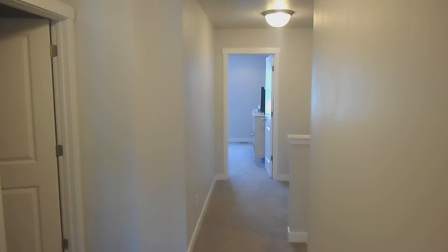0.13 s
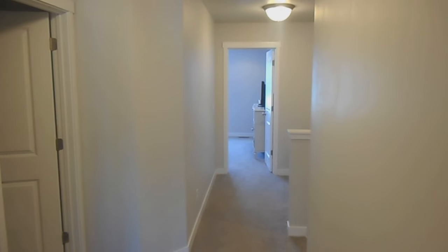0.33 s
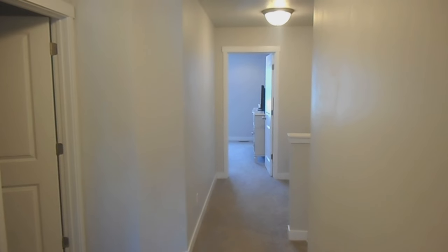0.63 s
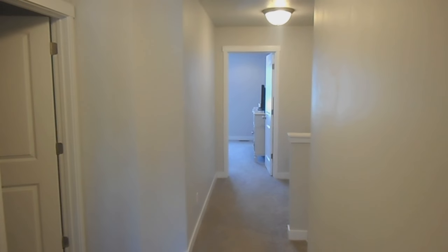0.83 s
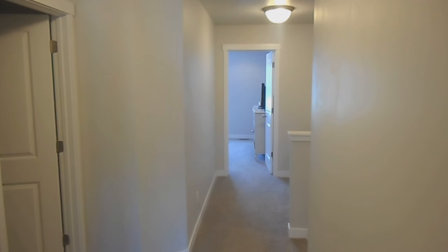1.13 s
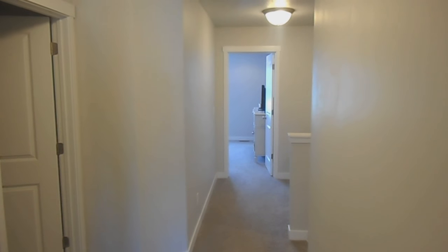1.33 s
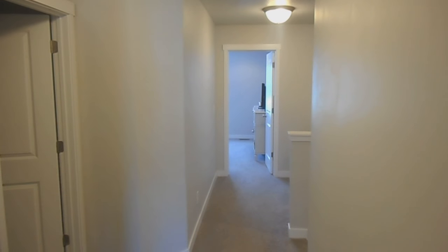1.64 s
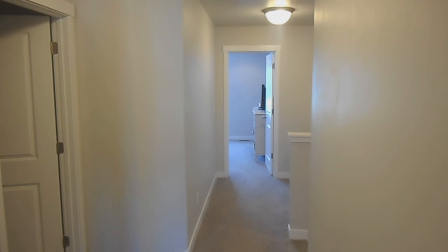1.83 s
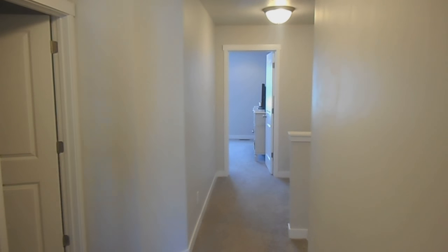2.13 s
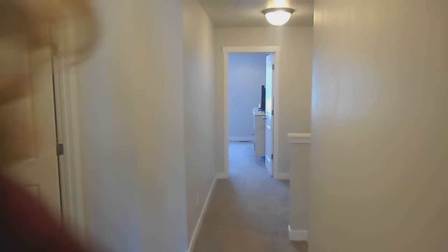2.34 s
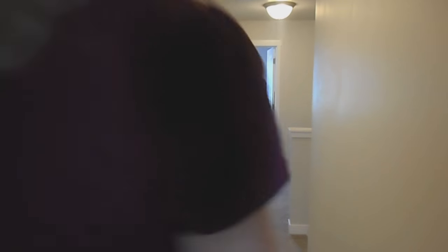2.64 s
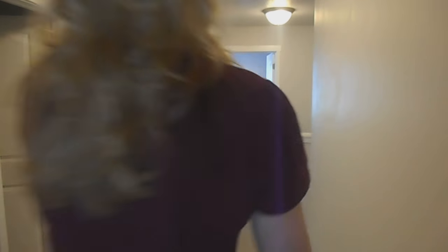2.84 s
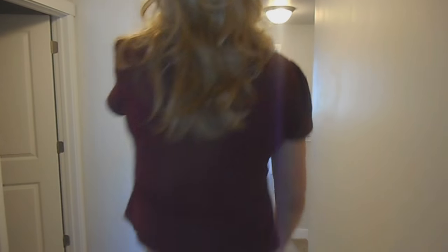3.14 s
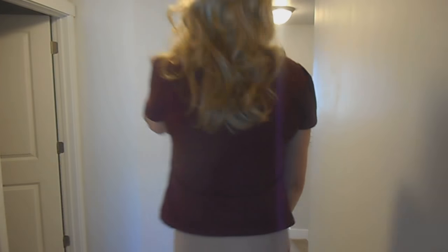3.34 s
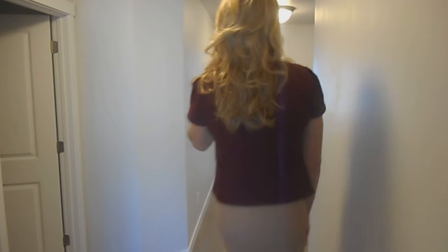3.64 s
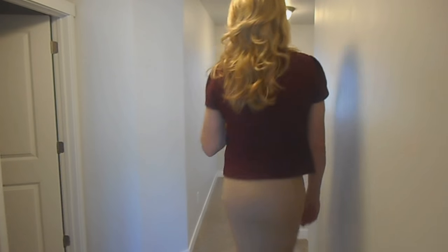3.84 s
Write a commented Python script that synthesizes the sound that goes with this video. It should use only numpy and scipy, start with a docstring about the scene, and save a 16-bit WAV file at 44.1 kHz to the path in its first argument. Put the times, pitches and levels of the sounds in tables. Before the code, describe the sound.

Muffled steps on carpet pass by with swishing clothes, then a sudden bright snap.

```python
"""A narrow carpeted hallway, heard in mono as someone walks softly past the microphone and on.
Soles thud and brush on the pile, the boards beneath knock, and clothes swish, with small ticks and
brief rasps, over a steady hiss. The walk ends in a hard scuff and one sharp, bright snap,
a quick cluster of cracks that rings between the close walls."""
import sys
import numpy as np
from scipy import signal
from scipy.fft import rfft, irfft
from scipy.io import wavfile

SR = 44100
rng = np.random.default_rng(int(sys.argv[2]) if len(sys.argv) > 2 else 0)


def int16_out(signal):
    """Quantize to a 16-bit WAV file."""
    q = np.round(np.clip(np.atleast_2d(signal).T, -1, 1) * 32767)
    wavfile.write(sys.argv[1], SR, q.astype(np.int16))


N = 176400


def amp(db):
    """Decibels to gain."""
    return 10 ** (np.asarray(db) / 20)


def unit_rms(x):
    """Scales to rms 1."""
    return x / np.sqrt(np.mean(x ** 2) + 1e-20)


def curve_at(points, hz):
    """Reads a table on a log-frequency axis."""
    freqs, values = np.transpose(points)
    return np.interp(np.log(hz + 1), np.log(freqs + 1), values)


def add(mix, start_s, sound):
    """Mixes a sound in at its start time."""
    part = mix[max(round(start_s * SR), 0):][:len(sound)]
    part += sound[:len(part)]


def coloured(x, colour, tilt=0):
    """Gives x a spectrum, tilted in dB per octave above 400 Hz, at rms 1."""
    hz = np.fft.rfftfreq(len(x), 1 / SR)
    octaves = np.log2(np.maximum(hz, 400))
    gain = amp(curve_at(colour, hz) + tilt * octaves)
    return unit_rms(irfft(rfft(x) * gain, len(x)))


def burst(noise, envelope):
    """Shapes noise in time so that it carries exactly the energy of the envelope."""
    return unit_rms(noise * envelope) * np.sqrt(np.mean(envelope ** 2))


def blows(rows, colour, rise_s, fall_s):
    """Short contacts with no clear pitch: a quick rise and an exponential fall."""
    out, t = np.zeros(N), np.arange(SR // 2) / SR
    envelope = np.minimum(t / rise_s, 1) * np.exp(-np.maximum(t - rise_s, 0) / fall_s)
    for start, db, tilt in rows:
        noise = coloured(rng.standard_normal(len(t)), colour, tilt)
        add(out, start, amp(db) * burst(noise, envelope))
    return out


def friction(rows, colour, slip_share, slips_per_s=2500):
    """Fibres catch and slip in a fine hiss that swells and dies with each stroke."""
    out, t = np.zeros(N), np.arange(N) / SR
    for peak, rise, fall, db, tilt in rows:
        slips = unit_rms(rng.standard_normal(N) * (rng.random(N) < slips_per_s / SR))
        rubbing = np.sqrt(slip_share) * slips + np.sqrt(1 - slip_share) * rng.standard_normal(N)
        swell = np.exp(-.5 * ((t - peak) / rise) ** 2)
        fade = np.exp(1 - np.hypot(1, (t - peak) / fall * np.sqrt(2)))
        out += amp(db) * np.where(t < peak, swell, fade) * coloured(rubbing, colour, tilt)
    return out


# The hiss behind the walk. Each row: frequency in Hz, relative level in dB.
HISS_COLOUR = [(20, -28), (40, -18), (70, -18.5), (110, -15.5), (160, -16), (220, -12), (340, -10),
               (480, -8), (650, -10), (1000, -5.5), (1300, -8), (1800, -10.5), (2350, -8), (2900, -10.5),
               (4500, -11), (7700, -16.5), (10400, -26.5), (12500, -34)]

def background(hiss_db=-60.5, hum_hz=114, hum_db=-78, hum_end_s=.82, hum_fade_s=.15):
    """Steady hiss, and a faint low hum that fades early."""
    t = np.arange(N) / SR
    hiss = coloured(rng.standard_normal(N), HISS_COLOUR)
    hum = np.sin(2 * np.pi * hum_hz * t) * np.clip((hum_end_s - t) / hum_fade_s, 0, 1)
    return amp(hiss_db) * hiss + amp(hum_db) * hum


# Ticks along the hallway. Each row: start in seconds, level in dB, tilt in dB per octave.
TICKS = [(0.0832, -46, -1.5), (0.1138, -50, 1), (2.8674, -43.5, 1.5), (2.8844, -49, 1), (2.9755, -44.5, 2),
         (3.6036, -44, 0), (3.993, -47, -0.5)]
# Their tone. Each row: frequency in Hz, relative level in dB.
TICK_COLOUR = [(100, -11), (700, -5.5), (1600, 4.5), (3500, 0.5), (5500, -3.5), (8000, -11), (10500, -25.5)]

def ticks():
    """Small dry contacts that die within milliseconds."""
    return blows(TICKS, TICK_COLOUR, rise_s=.00097, fall_s=.0034)


# Soles on the carpet. Each row: peak, rise and fall in seconds, level in dB, tilt in dB per octave.
SCUFFS = [(0.095, .02, 0.047, -60.5, -1.5), (0.27, .08, 0.075, -63, -1.5), (0.86, 0.024, 0.037, -55.5, 0.5),
          (1.25, 0.028, 0.035, -55.5, -1.5), (1.335, .02, .04, -54.5, 2.5), (1.44, 0.038, 0.045, -54, -0.5),
          (2.085, 0.039, 0.045, -58, -2), (2.17, .03, .045, -55.5, -1.5), (2.3, 0.044, 0.047, -53.5, 0),
          (2.6, .14, 0.093, -61, 2), (2.878, 0.046, .04, -50.5, 0), (3.0, .05, 0.074, -57.5, 2.5),
          (3.462, 0.014, .045, -53, 1), (3.555, 0.036, 0.069, -54.5, 0.5), (3.684, 0.015, .018, -43, 2),
          (3.72, .015, 0.02, -56, -2)]
# Their tone. Each row: frequency in Hz, relative level in dB.
SCUFF_COLOUR = [(40, -22), (150, -11.5), (300, -10.5), (450, -4), (650, -1), (1200, 1), (2000, -4.5),
                (3400, -4.5), (5500, -12.5), (8000, -20.5), (10500, -33)]

def scuffs():
    """Soles brush the pile with a grainy rub."""
    return friction(SCUFFS, SCUFF_COLOUR, slip_share=.45)


# Clothes passing the microphone.
# Each row: peak, rise and fall in seconds, level in dB, tilt in dB per octave.
SWISHES = [(0.1, 0.022, 0.044, -65, -4), (0.87, 0.038, .06, -65, 6), (1.33, 0.069, 0.059, -58.5, 2),
           (1.46, .035, 0.037, -52, 1.5), (1.572, 0.033, 0.047, -50, 0.5), (1.85, 0.18, 0.37, -64, 2),
           (2.18, .045, 0.071, -55.5, 1.5), (2.3, 0.044, 0.054, -56.5, 0.5), (2.48, 0.053, 0.078, -55.5, 1),
           (2.73, 0.11, 0.16, -59, 1.5), (2.96, 0.089, 0.094, -58.5, 0), (3.17, 0.056, 0.17, -58.5, 2),
           (3.55, 0.086, 0.13, -60, 1), (3.69, 0.016, .02, -56, -2), (3.8, 0.046, 0.15, -61.5, 1.5)]
# Their tone. Each row: frequency in Hz, relative level in dB.
SWISH_COLOUR = [(60, -25), (400, -11.5), (1200, -8), (2300, -0.5), (3800, -1.5), (5500, -4), (7500, -8.5),
                (10500, -19)]

def clothes():
    """Cloth slides on cloth, smoother and brighter than the soles."""
    return friction(SWISHES, SWISH_COLOUR, slip_share=.31)


# Steps going by the microphone. Each row: start in seconds, level in dB, tilt in dB per octave.
STEPS = [(0.834, -59.5, -6), (1.2775, -41, 1), (2.006, -56.5, -2), (2.729, -62, -1), (3.452, -60, -1),
         (3.993, -55.5, 0)]
# Their tone. Each row: frequency in Hz, relative level in dB.
STEP_COLOUR = [(30, -24), (90, -18), (150, -5), (230, 0), (310, 2), (430, -7), (650, 0.5), (950, 0.5),
               (1400, -7.5), (2600, -14), (5000, -33), (10000, -43)]

def footfalls():
    """Each sole lands with a thud that the carpet muffles."""
    return blows(STEPS, STEP_COLOUR, rise_s=.0029, fall_s=.017)


# Boards knocking under the carpet. Each row: start in seconds, level in dB, pitch in Hz.
KNOCKS = [(0.835, -57, 150), (0.872, -62, 170), (1.281, -62, 230), (1.968, -49, 210), (2.003, -49.5, 237),
          (2.041, -51.5, 210), (2.078, -51, 202), (2.13, -58, 210), (2.243, -51, 191), (2.266, -54, 216),
          (2.322, -64, 178), (2.684, -57, 210), (2.706, -59, 225), (2.729, -48.5, 205), (2.784, -58, 170),
          (2.835, -59, 159), (2.877, -60, 148), (3.402, -66, 180), (3.56, -64, 175), (3.865, -46, 231),
          (3.882, -43, 232), (3.91, -46.5, 245), (3.95, -51.5, 195), (3.985, -53, 218)]
# The thud in each knock. Each row: frequency in Hz, relative level in dB.
THUD_COLOUR = [(40, -17), (110, -15), (200, 0), (320, -4), (480, -6), (800, -13), (2000, -31), (8000, -48)]

def boards(thud_db=-10, rise_s=.0037):
    """Each shift of weight gives a dull thud and one low, heavily damped mode."""
    thuds = [(start, db + thud_db, 0) for start, db, _ in KNOCKS]
    out = blows(thuds, THUD_COLOUR, rise_s, fall_s=.012)
    for start, db, hz in KNOCKS:
        add(out, start, mode(hz, db, t60_s=.068, rise_s=rise_s))
    return out


def mode(hz, db, t60_s, rise_s):
    """One dying resonance with a soft start."""
    t = np.arange(SR // 2) / SR
    envelope = np.minimum(t / rise_s, 1) * np.exp(-np.log(1000) * t / t60_s)
    return amp(db) * envelope * np.sin(2 * np.pi * (hz * t + rng.random()))


# Where the rubbing catches. Each row: peak and half length in seconds, pitch in Hz, level in dB.
RASPS = [(0.868, .018, 2460, -61.5), (1.549, 0.0088, 1730, -58.5), (1.572, .018, 2340, -57.5),
         (1.578, .02, 3680, -60), (3.693, 0.012, 468, -54), (3.684, .012, 1330, -51),
         (3.689, .01, 1883, -54), (3.692, .01, 2173, -54.5), (3.695, .009, 3470, -52.5),
         (3.697, .008, 3894, -55), (3.715, 0.016, 860, -54.5)]

def rasps(half_width_hz=61):
    """Friction noise caught for a moment in a narrow resonance."""
    out = np.zeros(N)
    t = (np.arange(SR // 2) - SR // 4) / SR  # centred on the peak
    freqs = np.fft.rfftfreq(len(t), 1 / SR)
    for peak, half_length, hz, db in RASPS:
        resonance = 1 / (1 + ((freqs - hz) / half_width_hz) ** 2)
        tone = irfft(rfft(rng.standard_normal(len(t))) * resonance, len(t))
        envelope = np.exp(-.5 * (t / half_length) ** 2)
        add(out, peak + t[0], amp(db) * burst(tone, envelope))
    return out


# The snap's darkening cracks. Each row: start in seconds, level in dB, tilt in dB per octave.
CRACKS = [(3.8632, -33.5, 1.5), (3.866, -25, 2), (3.8688, -25.5, 1.5), (3.8725, -28.5, -1),
          (3.8757, -27, -2.5)]
# Their tone. Each row: frequency in Hz, relative level in dB.
CRACK_COLOUR = [(60, -33), (130, -43), (300, -21), (550, -22.5), (900, -12), (1600, -14.5), (2400, -9),
                (3000, -5), (4400, -0.5), (5200, -3.5), (6200, -12.5), (8500, -18.5), (10500, -32)]
# What the snap sets ringing. Each row: pitch in Hz, level in dB on top of ring_db, t60 in seconds.
SNAP_MODES = [(915, -8, 0.23), (1243, 4, 0.14), (1946, -1, 0.27), (2320, -8, .2), (2960, 2, .17),
              (3730, -6, 0.18), (3890, -3, .18), (4100, -4.5, .22), (4280, -5, .22), (4700, -7, 0.17),
              (4890, -22, .17), (5600, -9, .2)]

def snap(ring_start_s=3.867, ring_db=-42.5):
    """Several cracks milliseconds apart, each echoed by the walls, and the ring that they leave."""
    out = np.zeros(N)
    for row in CRACKS:
        crack = blows([row], CRACK_COLOUR, rise_s=.0007, fall_s=.0061)
        out += hallway(crack, wet_db=-4.5)
    for hz, db, t60_s in SNAP_MODES:
        add(out, ring_start_s, mode(hz, ring_db + db, t60_s, rise_s=.0054))
    return out


# The hallway's decay. Each row: frequency in Hz, t60 in seconds.
HALL_DECAY = [(100, 0.36), (400, 0.41), (1200, 0.37), (4000, 0.33), (10000, 0.31)]

def hallway(x, wet_db, gap_s=.008):
    """Adds dense reflections from the close walls, each band dying at its own speed."""
    reflections = rng.standard_normal(SR // 2) * (rng.random(SR // 2) < .1)
    hz, t, bands = signal.stft(reflections, SR, nperseg=256)
    decay = np.exp(-np.log(1000) * t / curve_at(HALL_DECAY, hz)[:, None])
    _, tail = signal.istft(bands * decay, SR)
    out = x.copy()
    add(out, gap_s, amp(wet_db) * signal.fftconvolve(x, tail / np.linalg.norm(tail)))
    return out


def scene():
    """The walk and the snap at the microphone, the same in both channels."""
    walker = footfalls() + scuffs() + clothes() + ticks() + rasps()
    mono = hallway(walker, wet_db=-6.5) + hallway(boards(), wet_db=-11) + snap() + background()
    return np.array([mono, mono])


# The response of the recorder behind the microphone. Each row: frequency in Hz, gain in dB.
RECORDER_RESPONSE = [(20, 0), (9900, 0), (10500, -5), (10800, -17), (11050, -38), (11400, -23),
                     (12000, -20), (12500, -26)]

def record(dry):
    """The sound starts after a brief silence; the recorder loses the top treble, then cuts off steeply."""
    silence_s, cutoff_hz = .036, 12300
    started = dry * (np.arange(N) >= silence_s * SR)
    response = amp(curve_at(RECORDER_RESPONSE, np.fft.rfftfreq(2 * N, 1 / SR)))
    dulled = irfft(rfft(started, 2 * N) * response)[:, :N]
    lowpass = signal.firwin(255, cutoff_hz, window=("kaiser", 7), fs=SR)
    return signal.oaconvolve(dulled, lowpass[None], "same")


dry = scene()
out = record(dry)
int16_out(out)
```